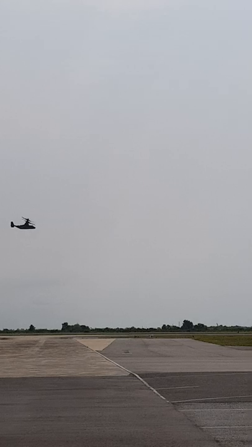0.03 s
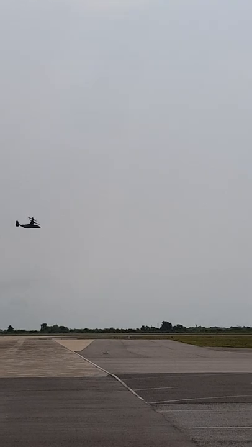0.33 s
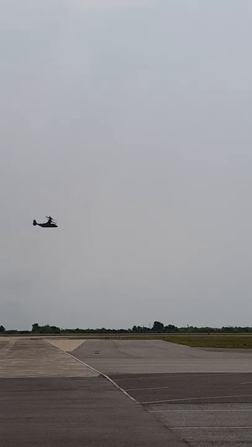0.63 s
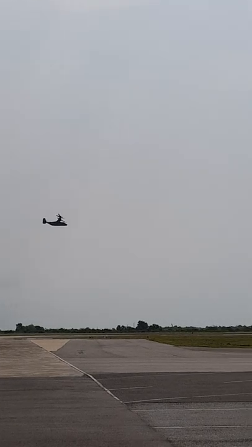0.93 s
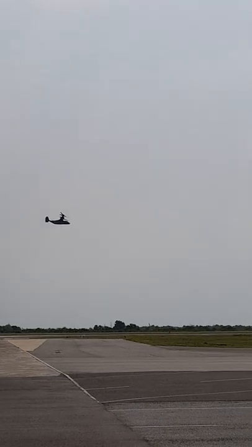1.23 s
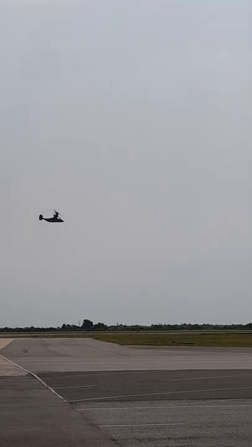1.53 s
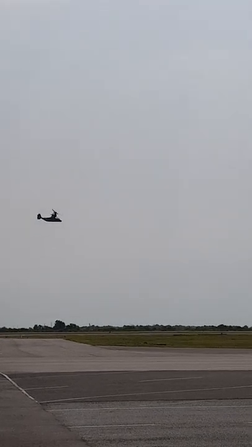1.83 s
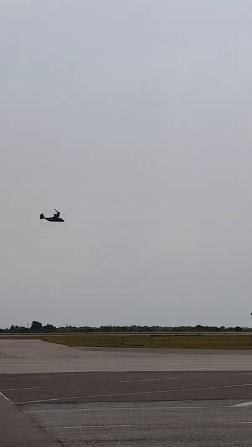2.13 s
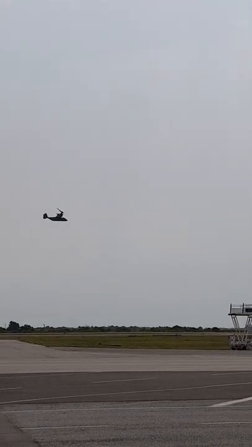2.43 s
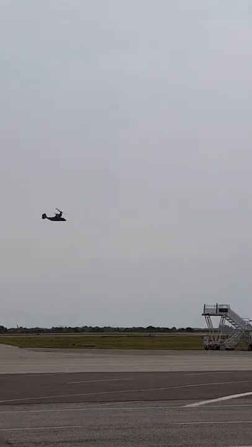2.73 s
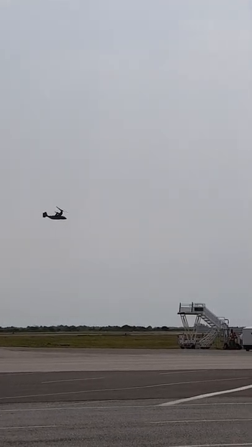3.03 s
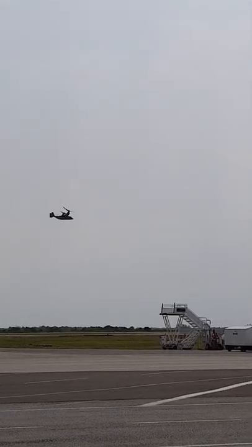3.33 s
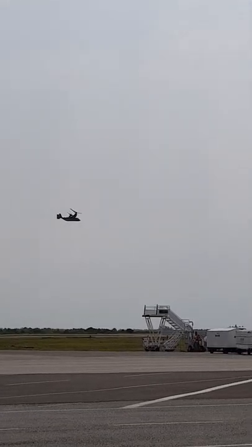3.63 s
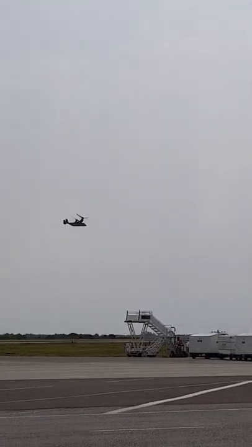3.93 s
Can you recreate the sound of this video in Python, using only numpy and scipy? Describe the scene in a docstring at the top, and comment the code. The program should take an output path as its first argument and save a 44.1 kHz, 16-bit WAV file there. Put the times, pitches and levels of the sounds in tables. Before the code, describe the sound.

A distant tiltrotor aircraft flies by, rotors thumping rapidly under a wavering engine roar.

```python
"""A tiltrotor flies by, far beyond an airfield apron. Each blade pass of its two rotors sends a low
thump and churns up a rumble; the roar of engines and rotor wash swells and fades in the moving air,
with a faint turbine whine. A nearby hard surface adds one short echo. Light wind rumbles at the
microphone, whose left side is weaker and duller; faint hiss, ticks and a rustle lie underneath."""
import sys
import numpy as np
from scipy import signal
from scipy.fft import rfft, irfft
from scipy.io import wavfile
from scipy.ndimage import uniform_filter1d

SR = 44100
rng = np.random.default_rng(int(sys.argv[2]) if len(sys.argv) > 2 else 0)


def put_to_file(sound):
    """Save the sound as 16-bit audio at rate SR, in the file named by the first command-line argument."""
    columns = np.atleast_2d(sound).T  # one column per channel
    safe = np.clip(columns, -1, 1)
    whole_steps = np.round(safe * 32767)
    wavfile.write(sys.argv[1], SR, whole_steps.astype(np.int16))


N = 176400

# Blade rate, slowed by the Doppler shift. Each row: time in seconds, passes per second.
BLADE_RATE_HZ = [(0, 20.5), (1, 20.33), (2, 19.9), (3, 19.57), (4, 19.55)]
# One thump. Each row: frequency in Hz, relative level in dB.
THUMP_SPECTRUM = [(6, -64.5), (20, -23.5), (40, -7.5), (60, 8.5), (80, 4.5), (100, 5), (120, -10),
                  (145, -12), (165, -11.5), (200, -37.5), (300, -31), (600, -73), (2000, -110)]
# Thump strength. Each row: time in seconds, gain in dB.
THUMP_GAIN_DB = [(0, -23.5), (.2, -24.5), (.27, -30), (.37, -26.5), (.54, -23.3), (.7, -31), (.93, -29),
                 (1.08, -28.5), (1.35, -28.5), (1.76, -27.5), (2.02, -29), (2.35, -27), (2.6, -28.5),
                 (2.9, -28.5), (3.3, -28), (3.55, -27.5), (3.68, -36.5), (3.82, -31.5), (4, -33.5)]
# Single accented blades. Each row: time in seconds, gain in dB.
BLADE_ACCENTS = [(.017, -0.5), (1.047, 4.5), (1.243, 6), (1.74, 3), (3.06, 3.5)]
# Far rotor; when strong, the beat blurs into a hum. Each row: time in seconds, dB re the near rotor.
FAR_ROTOR_DB = [(0, -20), (.6, -15.5), (.75, -6), (.98, -6), (1.08, -14.5), (3.55, -14.5), (3.7, -11),
                (4, -12)]
# Churning air behind the blades. Each row: frequency in Hz, relative density in dB.
WAKE_SPECTRUM = [(24, -41.5), (45, 0), (80, -3.5), (125, 0.5), (160, -4), (220, -7.5), (300, -14),
                 (450, -23), (900, -71.5), (3000, -100)]
# Engines and wash. Each row: frequency in Hz, relative density in dB.
ROAR_SPECTRUM = [(100, 3), (250, 5.5), (380, 0.5), (520, -3), (700, -2), (950, -4.5), (1300, -7),
                 (1650, -9.5), (2100, -15.5), (2700, -19), (3300, -17), (3900, -20), (4400, -25.5),
                 (4900, -25.5), (5700, -35), (6800, -39), (8000, -55.5), (11000, -76)]
# Roar swells, used about each band's mean. Each row: time in seconds, low, middle, treble level in dB.
SWELLS_DB = [(0.0, -35, -42, -50.5), (0.08, -42, -39, -51), (0.3, -35, -34, -49), (0.44, -40.5, -45, -56),
             (0.68, -42, -44, -57), (0.82, -38.5, -41.5, -51.5), (1.17, -39, -49, -58.5),
             (1.37, -37.5, -42.5, -53), (1.44, -28.5, -38.5, -45), (1.63, -33.5, -36, -49),
             (1.73, -36, -42.5, -56), (1.82, -39, -45.5, -57), (1.98, -38, -36.5, -53.5),
             (2.09, -36.5, -45, -55.5), (2.39, -38, -43.5, -49.5), (2.45, -40, -46.5, -56),
             (2.6, -37.5, -41, -51.5), (2.91, -40, -42, -51.5), (2.94, -41.5, -42.5, -50.5),
             (3.13, -40, -50, -60.5), (3.24, -43.5, -48, -54.5), (3.3, -36, -46.5, -51.5),
             (3.33, -40.5, -45, -52), (3.46, -36, -38.5, -48.5), (3.7, -39, -48, -57),
             (3.78, -38.5, -43.5, -50.5), (3.88, -39.5, -45.5, -59.5), (4.0, -39, -45, -52)]
# Centres of the low, middle and treble bands in Hz.
SWELL_BANDS_HZ = [600, 1400, 3300]
# Roar flares and hollows. Each row: time and half-length in seconds, centre in Hz,
# half-width in octaves, peak gain in dB.
ROAR_FLARES = [(0.207, 0.22, 1036, 0.33, -5), (0.27, 0.41, 653, 0.31, 5.5), (0.287, 0.023, 1470, 0.37, 4),
               (0.897, 0.049, 1260, 0.019, 13), (0.943, 0.037, 426, 0.59, 6.5),
               (1.497, 0.3, 1230, 0.16, -4.5), (1.57, 0.076, 715, 0.46, 7.5), (1.512, 0.023, 230, .5, 4.5),
               (1.484, 0.066, 1620, 0.2, 6), (1.612, 0.038, 297, 0.49, 10), (2.145, 0.079, 910, 0.26, 8),
               (2.757, 0.29, 1100, 0.21, 4.5), (2.94, 0.087, 386, 0.084, 17.5),
               (3.285, 0.032, 1020, 0.37, 11.5), (3.791, 0.034, 710, 1, 6.5)]
# Turbine tones. Each row: centre in Hz, half-width in Hz, level in dB.
TURBINE_TONES = [(1268, 16, -59.5), (3810, 86, -65), (4650, 90, -75)]
# Treble flutter. Each row: frequency in Hz, relative density in dB.
FLUTTER_SPECTRUM = [(2500, -9), (5500, 3), (8000, -4.5), (15500, -10.5)]
# Wind at the microphone. Each row: frequency in Hz, relative density in dB.
WIND_SPECTRUM = [(14, -49.5), (27, -18.5), (42, 8.5), (80, 6), (130, -3), (300, -16), (4000, -92)]
# Microphone self-noise. Each row: frequency in Hz, relative density in dB.
MIC_HISS_SPECTRUM = [(4000, -10), (8000, -11.5), (9500, -4), (11200, 1.5), (13000, -2), (15500, -7)]
# Far airfield hiss. Each row: frequency in Hz, relative density in dB.
AIRFIELD_SPECTRUM = [(500, -3), (3500, -2.5), (5000, -4.5), (6700, -13.5), (8000, -32.5), (11000, -63.5)]
# Dull knocks. Each row: time and half-length in seconds, pitch in Hz, peak level in dB.
KNOCKS = [(.202, .012, 146, -18), (.66, .012, 156.6, -21.5), (.95, 0.0028, 260, -23.5),
          (1.212, 0.0037, 262, -21.5)]
# Ticks near the microphone. Each row: start in seconds, starting level in dB.
NEAR_TICKS = [(.54, -55), (.752, -52), (.9, -53)]
# Imbalance of the microphone's ports. Each row: frequency in Hz, left minus right in dB.
PORT_BALANCE_DB = [(60, -6.5), (200, -7.0), (380, -6), (700, -4.5), (1290, -5.5), (2380, -6.5), (4400, -16),
                   (8120, -15), (15000, -5.5)]
# Likeness of the ports. Each row: frequency in Hz, shared power from 0 to 1.
PORT_COHERENCE = [(60, 0.79), (150, 0.87), (300, 0.78), (640, 0.68), (1400, 0.6), (2500, 0.33),
                  (4000, 0.52), (8000, .03)]
# Phase between the ports. Each row: frequency in Hz, left lead in radians.
PORT_LEAD_RAD = [(450, .1), (900, -0.92), (1100, 1), (1420, -1.1), (1650, 1), (2250, 0.96), (2800, -2.2),
                 (4000, -1.4)]

BIN_HZ = np.fft.rfftfreq(N, 1 / SR)


def undb(db):
    return 10 ** (np.asarray(db) / 20)


def bell(x, centre, half_width):
    return np.exp(-((x - centre) / half_width) ** 2)


def over_time(rows, column=1):
    """A table column, interpolated per sample."""
    rows = np.array(rows)
    return np.interp(np.arange(N) / SR, rows[:, 0], rows[:, column])


def over_bins(rows):
    """A table, interpolated per FFT bin on a log axis."""
    rows = np.array(rows)
    return np.interp(np.log(np.maximum(BIN_HZ, 1)), np.log(rows[:, 0]), rows[:, 1])


def colour(x, spectrum):
    """Filter by rows of Hz, dB."""
    return irfft(rfft(x) * undb(over_bins(spectrum)), N)


def at_level(pair, rms_db):
    """Set the rms of a stereo pair's centre."""
    return pair * undb(rms_db) / np.sqrt(np.mean(pair.mean(axis=0) ** 2))


def white_pair():
    return rng.standard_normal((2, N))


def ports(x):
    """The left port hears less than the right, above all in the treble."""
    left = undb(over_bins(PORT_BALANCE_DB))
    gains = np.array([left, np.ones_like(left)]) * 2 / (1 + left)
    return irfft(rfft(x) * gains, N)


def reflect(x, delay_s=.01338, echo_db=-5.5):
    """Direct sound plus one echo off a hard surface, which combs the spectrum."""
    gain = undb(echo_db)
    return (x + gain * np.roll(x, int(delay_s * SR))) / np.hypot(1, gain)


def air_noise(spectrum):
    """Stereo noise: an echoed share that both ports hear, and an unrelated scattered share."""
    coherence = np.clip(over_bins(PORT_COHERENCE), 0, 1)
    phase_shift = np.exp(.5j * over_bins(PORT_LEAD_RAD) * np.array([[1], [-1]]))
    shared = np.sqrt(coherence) * phase_shift * rfft(reflect(rng.standard_normal(N)))
    scattered = np.sqrt(1 - coherence) * rfft(white_pair())
    return colour(irfft(shared + scattered, N), spectrum)


def throb(passes, depth):
    """Gain that swells on every blade pass."""
    return 1 + depth * np.cos(2 * np.pi * passes)


def swell_db(band):
    """Moving air lifts and drops a band (0 low, 1 middle, 2 treble) about its mean."""
    band_db = over_time(SWELLS_DB, column=band + 1)
    return band_db - band_db.mean()


def crackle(spread_db, grain_s=.0015):
    """Gain that varies at random from grain to grain."""
    size = int(grain_s * SR)
    gains = undb(spread_db * rng.standard_normal(N // size + 1))
    return uniform_filter1d(np.repeat(gains, size), size)[:N]


def rotor_thumps(t, passes, scatter_db=.6, jitter_s=.0002, far_lag_passes=.5):
    """One low pressure pulse per blade; the far rotor's fall between the near rotor's."""
    blades = np.arange(int(passes[-1]) + 1)
    strength, slip = rng.standard_normal((len(blades), 2)).T
    times_s = np.interp(blades, passes, t) + jitter_s * slip
    accent_db = sum(db * (blades == np.argmin(np.abs(times_s - at_s))) for at_s, db in BLADE_ACCENTS)
    near, far = np.zeros((2, N))
    near[np.clip((times_s * SR).astype(int), 0, N - 1)] = undb(scatter_db * strength + accent_db)
    far[np.searchsorted(passes, blades[:-1] + far_lag_passes)] = 1
    pulses = near + far * undb(over_time(FAR_ROTOR_DB))
    beat = ports(reflect(colour(pulses, THUMP_SPECTRUM)))
    return at_level(beat, 4) * undb(over_time(THUMP_GAIN_DB))


def rotor_wake(t, passes, fall_db_per_s=1.33):
    """Low turbulence that throbs with the blades and slowly recedes."""
    rumble = ports(air_noise(WAKE_SPECTRUM) * throb(passes, depth=.067))
    return at_level(rumble, -27) * undb(-fall_db_per_s * t)


def engine_roar(passes):
    """Broad engine and wash noise, swelling in three bands on its way through the air."""
    noise = ports(air_noise(ROAR_SPECTRUM) * throb(passes, depth=.087))
    spectrum = rfft(at_level(noise, -36))
    roar = 0
    for band, weights in enumerate(np.eye(len(SWELL_BANDS_HZ))):
        crossover = over_bins(list(zip(SWELL_BANDS_HZ, weights)))
        roar = roar + irfft(spectrum * crossover, N) * undb(swell_db(band))
    return roar


def flare(roar, t):
    """Single regions of the spectrum briefly flare or hollow out."""
    octaves = np.log2(np.maximum(BIN_HZ, 1))
    spectrum = rfft(roar)
    for at_s, half_s, hz, half_octaves, db in ROAR_FLARES:
        band = irfft(spectrum * bell(octaves, np.log2(hz), half_octaves), N)
        roar = roar + band * (undb(db * bell(t, at_s, half_s)) - 1)
    return roar


def turbine_whine():
    """Tones smeared by the air, following the roar's treble swells at half depth."""
    tones = 0
    for hz, half_hz, db in TURBINE_TONES:
        tone = irfft(rfft(white_pair()) * bell(BIN_HZ, hz, half_hz), N)
        tones = tones + at_level(ports(tone), db)
    return tones * undb(swell_db(band=2) / 2)


def treble_flutter(t, passes, peak_s=.93, half_s=.99, lead_s=.007, sharpness=.45):
    """For a while, faint crackly treble puffs pulse in time with the thumps."""
    early_passes = passes + lead_s * over_time(BLADE_RATE_HZ)
    puffs = np.exp(sharpness * np.cos(2 * np.pi * early_passes))
    treble = air_noise(FLUTTER_SPECTRUM) * crackle(spread_db=2.8)
    return at_level(treble * puffs * bell(t, peak_s, half_s), -75)


def wind_and_hiss(mic_left_db=-3):
    """Steady wind rumble, microphone hiss and far airfield hiss, unrelated at the two ports."""
    wind = ports(colour(white_pair(), WIND_SPECTRUM))
    mic_hiss = colour(white_pair(), MIC_HISS_SPECTRUM) * undb([[mic_left_db], [0]])
    airfield = ports(colour(white_pair(), AIRFIELD_SPECTRUM))
    return at_level(wind, -36.5) + at_level(mic_hiss, -75) + at_level(airfield, -61.5)


def knocks(t):
    """Short, dull tone bursts that stand out of the rumble."""
    bursts = sum(undb(db) * bell(t, at_s, half_s) * np.cos(2 * np.pi * hz * (t - at_s))
                 for at_s, half_s, hz, db in KNOCKS)
    return ports(bursts)


def ticks_and_rustle(t, centre_hz=12000, decay_s=.001, rustle_at_s=3.88, rustle_half_s=.12):
    """Tiny bright clicks near the microphone, then a brief rustle of the same colour."""
    ticks = sum(undb(db) * (t >= at_s) * np.exp(-np.abs(t - at_s) / decay_s) for at_s, db in NEAR_TICKS)
    rustle = undb(-77) * crackle(spread_db=4) * bell(t, rustle_at_s, rustle_half_s)
    bright = air_noise([(centre_hz / 2, -20), (centre_hz, 0), (centre_hz * 2, -20)])
    return at_level(bright, 0) * (ticks + rustle)


def scene(first_blade_s=.01678):
    """The running count of blade passes drives thumps, wake and roar."""
    t = np.arange(N) / SR
    rate_hz = over_time(BLADE_RATE_HZ)
    passes = np.cumsum(rate_hz) / SR - first_blade_s * rate_hz[0]
    rotors = rotor_thumps(t, passes) + rotor_wake(t, passes)
    engines = flare(engine_roar(passes), t) + turbine_whine()
    details = treble_flutter(t, passes) + knocks(t) + ticks_and_rustle(t)
    return rotors + engines + details + wind_and_hiss()


def record(dry, fade_s=.004, cutoff_hz=15720):
    """Short fades at both ends and a steep low-pass."""
    edge_samples = np.minimum(np.arange(N), np.arange(N)[::-1])
    fade = np.minimum(edge_samples / (fade_s * SR), 1)
    lowpass = signal.ellip(10, .1, 80, cutoff_hz, fs=SR, output="sos")
    return signal.sosfilt(lowpass, dry * fade)


dry = scene()
out = record(dry)
put_to_file(out)
```